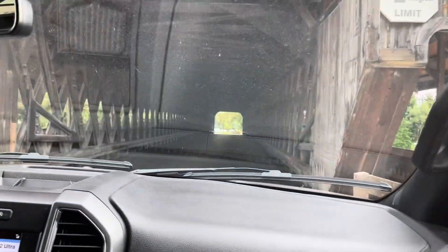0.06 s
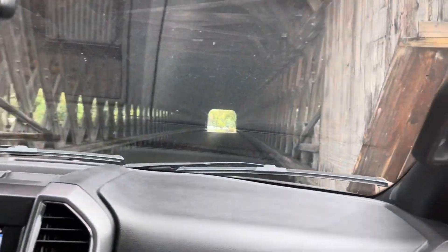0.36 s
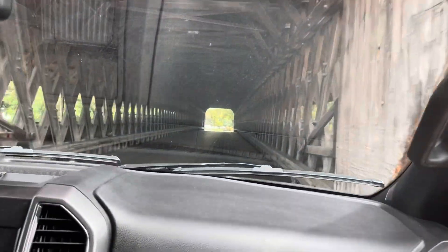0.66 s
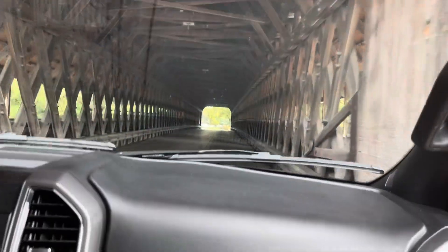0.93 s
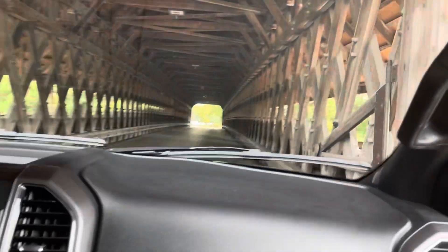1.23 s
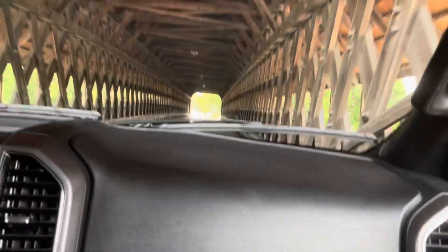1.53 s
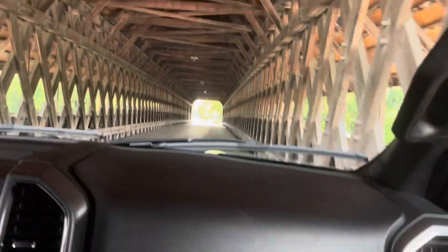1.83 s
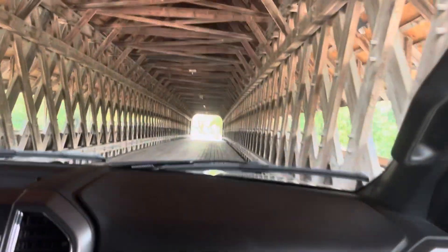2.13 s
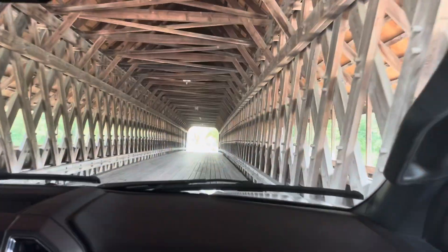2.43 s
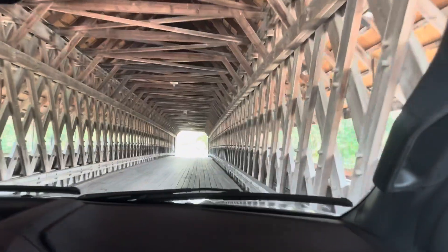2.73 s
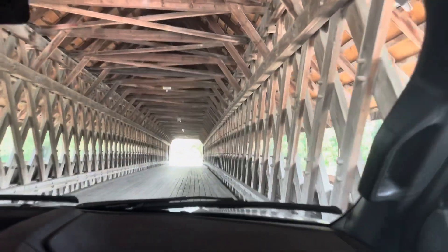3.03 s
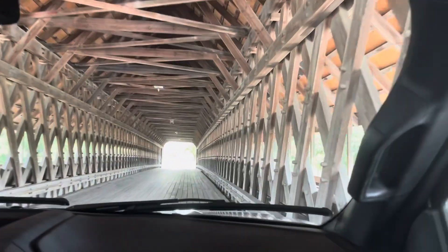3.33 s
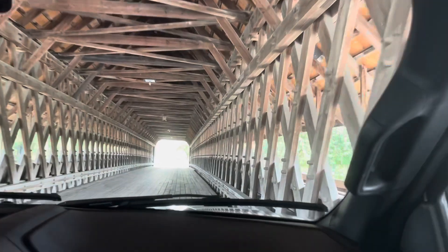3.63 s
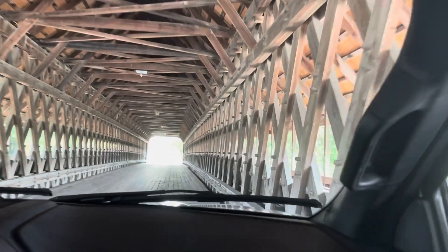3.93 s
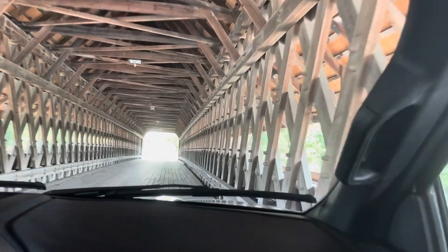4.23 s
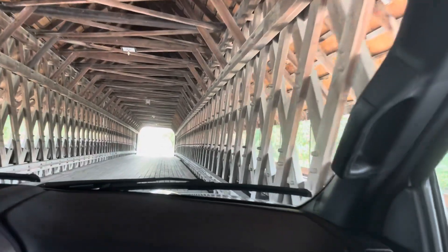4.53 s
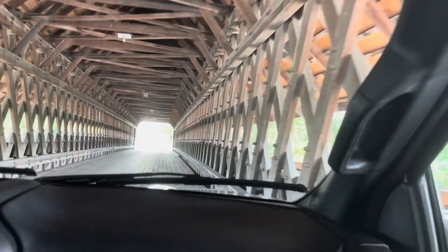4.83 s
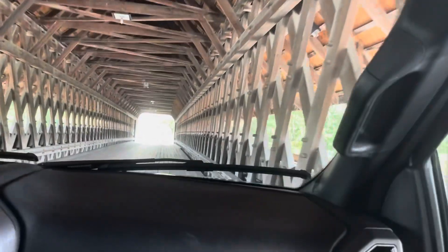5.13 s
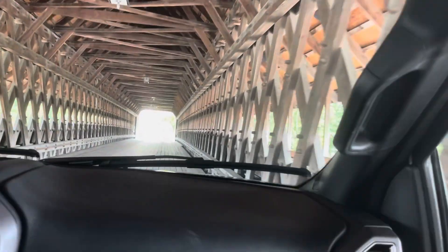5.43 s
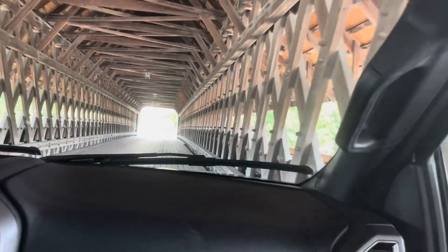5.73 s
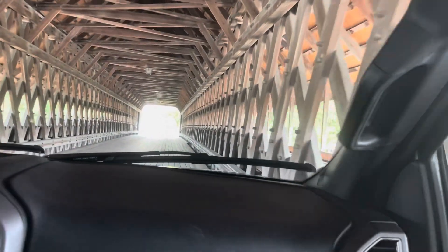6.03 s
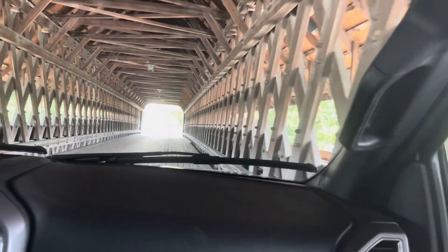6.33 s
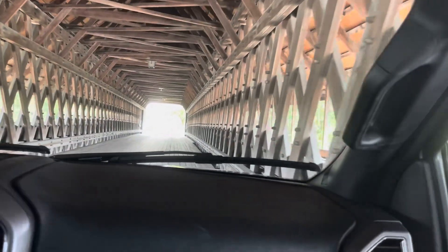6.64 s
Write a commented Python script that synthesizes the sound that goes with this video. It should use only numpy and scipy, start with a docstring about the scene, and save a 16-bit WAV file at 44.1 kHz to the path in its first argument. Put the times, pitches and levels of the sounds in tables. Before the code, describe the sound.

Inside a pickup's cab, slowly rolling tyres rumble under a low engine drone and a soft hiss from the air vents. The front wheels hit a wooden bridge deck with a booming thump, rattling trim and a hard knock. About a second later the rear wheels land with another deep thump and rattle. The rumble carries on, with faint cloth rustles and a few sharp plastic ticks close to the microphone.

```python
"""Pickup entering a covered wooden bridge.

Heard in the cab, the slowly rolling tyres rumble under a low engine drone and the hiss of air vents.
Front, then rear wheels strike the deck: each impulse excites the modes of the body, which booms,
and loose things rattle. Cloth rustles, and nearby plastic ticks set the microphone port or case ringing."""
import sys
import numpy as np
from scipy import signal
from scipy.fft import rfft, irfft
from scipy.io import wavfile
from scipy.ndimage import uniform_filter1d

SR = 44100
rng = np.random.default_rng(int(sys.argv[2]) if len(sys.argv) > 2 else 0)


def transcribe(u):
    """Save the signal u as a 16-bit wav file named by the first command-line argument.

    u: samples, shape (n,) or (channels, n), limited to [-1, 1]; the rate is SR.
    q: integer samples, one column per channel.
    """
    v = np.clip(np.atleast_2d(u).T, -1, 1)
    q = np.round(v * 32767).astype(np.int16)
    wavfile.write(sys.argv[1], SR, q)


N = 294147
T = np.arange(N) / SR
HZ = np.fft.rfftfreq(N, 1 / SR)
ROOF_HZ, ROOF_WIDTH_HZ = 144.7, 16  # resonance of the roof panel
# Shaking as the front, then the rear axle lands; levels in all tables are relative
# (t/s, rise/s, hold/s, release t60/s, rattle/dB, rustle/dB, roof drum/dB)
AXLES = [(1.222, 0.006, 0.27, 0.45, -43.5, -44.5, -24), (2.294, 0.12, .16, 1.0, -42, -46.5, -19)]
# Plastic ticks near the microphone (t/s, level/dB, t60/s, hollow part re bright part/dB)
TICKS = [(1.226, -31, 0.11, -3), (1.269, -34, 0.11, -0.5), (2.095, -38.5, 0.08, -27),
         (2.687, -34.5, 0.065, -28), (3.172, -51, 0.066, -12), (3.268, -44.5, 0.062, -24),
         (3.331, -53.5, .05, -12), (3.485, -53, .04, -14), (3.612, -44, 0.056, -6),
         (3.804, -47.5, 0.023, -5), (4.290, -29, 0.06, -7.5), (4.873, -30, 0.044, -10.5),
         (5.2315, -47, .06, -13), (6.429, -44, .03, -20), (6.434, -43, .06, -20)]


def amp(db):
    """Amplitude ratio of a level in decibels."""
    return 10 ** (np.asarray(db) / 20)


def unit_rms(x):
    """Normalisation to an rms value of 1."""
    return x / np.sqrt(np.mean(x ** 2) + 1e-20)


def spectrum_at(points, hz):
    """Interpolation of a spectrum on a logarithmic frequency axis."""
    f, value = np.transpose(points)
    return np.interp(np.log(hz + 1), np.log(f + 1), value)


def curve(rows, column=1):
    """Linear interpolation of one column of a time table at every sample."""
    rows = np.array(rows)
    return np.interp(T, rows[:, 0], rows[:, column])


def colour(x, points):
    """Minimum-phase filtering at unit energy; beyond its table the spectrum falls 48 dB an octave."""
    hz = abs(np.fft.fftfreq(8192, 1 / SR))
    octaves_below = np.maximum(np.log2(points[0][0] / (hz + 1)), 0)
    octaves_above = np.maximum(np.log2((hz + 1) / points[-1][0]), 0)
    gain = amp(np.maximum(spectrum_at(points, hz) - 48 * (octaves_below + octaves_above), -100))
    taps = np.fft.ifft(np.exp(np.conj(signal.hilbert(np.log(gain))))).real[:4096]
    return signal.oaconvolve(x, taps[None] / np.linalg.norm(taps), axes=1)[:, :N]


def noise():
    """Two uncorrelated white noises: the common and the diffuse part of the sound field."""
    return rng.standard_normal((2, N))


def drift(cutoff_hz):
    """Random modulation: low-pass noise of rms 1."""
    return unit_rms(irfft(rfft(rng.standard_normal(N)) / (1 + (HZ / cutoff_hz) ** 4), N))


def grains(per_s, spread_db):
    """Shot noise: impulses of uneven size at random times."""
    size = amp(spread_db * np.minimum(rng.exponential(1, N), 4))
    return unit_rms(noise() * size * (rng.random(N) < per_s / SR))


def resonance(hz, centre, width):
    """Lorentzian resonance curve, 1 at its centre."""
    return 1 / (1 + (2 * (hz - centre) / width) ** 2)


def resonant_noise(peaks):
    """Random excitation of resonances (f/Hz, width/Hz, level/dB), scaled to rms 1."""
    gain = sum(amp(db) * resonance(HZ, hz, width) for hz, width, db in peaks)
    return unit_rms(irfft(rfft(noise()) * gain, N))


def ring(modes, wave=np.sin):
    """Free vibration as a sum of damped modes (f/Hz, level/dB, t60/s)."""
    t = T[:SR]
    return sum(amp(db - 60 * t / t60) * wave(2 * np.pi * hz * t) for hz, db, t60 in modes)


def add(mix, s, sound):
    """Superposition of a sound on the mix from time s."""
    part = mix[round(s * SR):][:len(sound)]
    part += sound[:len(part)]


def clicks(rows):
    """One ideal impulse for each row that begins (t/s, level/dB)."""
    out = np.zeros(N)
    for s, db, *_ in rows:
        out[round(s * SR)] += amp(db)
    return out


def bursts(rows):
    """Reverberation: each contact (t/s, level/dB, t60/s) starts a dying scatter of reflections."""
    envelope = np.zeros(N)
    for s, db, t60 in rows:
        add(envelope, s, amp(db - 60 * T[:SR] / t60))
    return envelope * noise()


def rubs(rows):
    """Envelope of sliding friction: each stroke swells and fades in one cosine arch."""
    return sum(amp(db) * np.cos(np.pi * (T - s) / length) * (abs(T - s) < length / 2)
               for s, length, db in rows)


def shaking(levels_db, sag_db_per_s=21.5):
    """Envelope of the damped vibration after each axle lands: a rise, a sagging hold, a release."""
    envelope = np.zeros(N)
    for (s, rise, hold, t60, *_), db in zip(AXLES, levels_db):
        t = np.maximum(T - s, 0)
        sag_db = sag_db_per_s * np.minimum(t, hold)
        release_db = 60 * np.maximum(t - hold, 0) / t60
        envelope += np.sqrt(np.minimum(t / rise, 1)) * amp(db - sag_db - release_db)
    return envelope


def vents(hiss_db=-56, ducts_db=-56, waver=0.003, flutter_db=3):
    """Flow noise: a steady hiss, narrow duct resonances and faint, wavering whistles."""
    # Spectrum of the air hiss (f/Hz, density/dB)
    hiss_spectrum = [(600, -5.5), (1000, -3.5), (1450, 1.5), (2000, -1.5), (2500, -2), (3000, -3.5),
                     (3400, -10), (4000, -14), (4700, -17), (6000, -29.5), (7500, -34.5), (8900, -20),
                     (10000, -31), (12000, -31), (12800, -48)]
    # Duct resonances (f/Hz, width/Hz, level/dB)
    duct_modes = [(1230, 51, -0.5), (1320, 60, 1.5), (1594, 70, 1), (1710, 90, 1), (1813, 75, 2.5),
                  (2105, 60, -8), (2240, 120, -9), (2713, 65, -1), (2970, 70, -3), (3420, 68, -12),
                  (3960, 170, -13)]
    # Whistles of the grilles (f/Hz, level/dB)
    whistles = [(1815, -69), (2735, -73.5)]
    # Gain of resonances and whistles together (t/s, level/dB)
    duct_level = [(0, 0.5), (3.3, 0), (4.7, 2), (6.6, 1)]
    ducts = amp(ducts_db) * resonant_noise(duct_modes)
    for hz, db in whistles:
        phase = 2 * np.pi * np.cumsum(hz * (1 + waver * drift(25))) / SR
        ducts[0] += amp(db + flutter_db * drift(9)) * np.sin(phase)
    return amp(hiss_db) * colour(noise(), hiss_spectrum) + ducts * amp(curve(duct_level))


def cloth(rest_db=-73):
    """Friction noise: fine grains of sound from cloth that slides or is shaken by the axles."""
    # Strokes of cloth on the seat (middle t/s, length/s, level/dB)
    strokes = [(.19, 0.47, -59), (.97, 0.49, -62), (1.68, 0.49, -57), (2.85, 0.72, -60.5),
               (3.65, 0.23, -56.5), (4.945, .24, -53.5), (5.94, 0.27, -63.5), (6.3, 0.79, -70)]
    # Spectrum of the rustle (f/Hz, density/dB)
    rustle_spectrum = [(1500, -7.5), (3000, -1), (4500, -3.5), (6300, -3.5), (7300, -4), (8300, 0),
                       (8800, 1.5), (9600, 5.5), (10200, -4), (10800, -6), (11600, -12), (12500, -37)]
    *_, rustle_levels, _ = np.transpose(AXLES)
    sliding = np.hypot(rubs(strokes), shaking(rustle_levels))
    rustle = colour(grains(per_s=8700, spread_db=-0.5), rustle_spectrum)
    return rustle * np.hypot(sliding, amp(rest_db))


def squeak(hz=2575, waver=0.028):
    """Stick-slip oscillation: two pieces of trim rub and sing briefly."""
    # Faint squeaks (middle t/s, length/s, level/dB)
    squeaks = [(.298, .025, -54), (.318, .024, -49), (.351, .015, -46), (.366, .012, -54),
               (.388, .015, -52), (.401, .014, -50)]
    phase = 2 * np.pi * np.cumsum(hz * (1 + waver * drift(151))) / SR
    return rubs(squeaks) * np.sin(phase)


def engine(waver_db=0.5, rough_db=1, uneven_db=-13, roof_db=-35):
    """Periodic firing gives a drone and its harmonics; unequal cylinder banks add a half order."""
    # Engine drone (t/s, firing f/Hz, fundamental/dB, octave/dB)
    firing = [(0, 50.91, -20, -31), (.9, 49.54, -20.5, -37.5), (2.0, 52.25, -26.5, -37),
              (2.75, 59.8, -27, -36), (3.2, 61.7, -22, -31.5), (3.6, 60.6, -29.5, -31.5),
              (4.0, 57.84, -22.5, -24.5), (4.45, 57.01, -15, -26), (5.2, 56.7, -18, -23.5),
              (5.65, 55.8, -17.5, -31.5), (6.1, 55.4, -19.5, -36.5), (6.67, 54.84, -24.5, -34.5)]
    hz, drone_db, octave_db = (curve(firing, column) for column in (1, 2, 3))
    phase = 2 * np.pi * np.cumsum(hz * (1 + 0.004 * drift(4.9))) / SR
    drone = amp(drone_db + waver_db * drift(18)) * np.sin(phase)
    octave = amp(octave_db + rough_db * drift(21)) * np.sin(2 * phase + 0.11 * drift(22))
    banks = amp(uneven_db + drone_db + rough_db * drift(15)) * np.sin(1.5 * phase)
    # The roof hums when the third harmonic nears its resonance.
    roof = amp(roof_db) * resonance(3 * hz, ROOF_HZ, ROOF_WIDTH_HZ) * np.sin(3 * phase)
    return np.sqrt(2) * (drone + octave + banks + roof)


def tyres(roar_db=-30, flutter_db=0.76, evening=0.65, shaken_rumble_db=-12, shaken_roar_db=-4):
    """Rolling noise: a low rumble and a fluttering tread roar, both swelling as an axle lands."""
    # Spectrum of the rumble in the cab (f/Hz, density/dB)
    rumble_spectrum = [(25, -28.5), (30, -6), (34, -3), (40, 2), (47, -2.5), (70, -3), (90, -3),
                       (115, -11.5), (141, -17), (165, -20.5), (200, -24.5)]
    # Spectrum of the tread on the planks (f/Hz, density/dB)
    roar_spectrum = [(100, -28), (170, -3.5), (193, -4.5), (232, 0), (271, -8.5), (299, -8.5), (362, -7.5),
                     (459, -6.5), (673, -22.5), (815, -22), (884, -27), (1020, -27.5), (1500, -44),
                     (1950, -64.5), (3300, -120)]
    # Rumble over road and deck (t/s, level/dB)
    surface_level = [(0, -18.5), (1.8, -17.5), (2.22, -22), (2.45, -18.5), (3.4, -19), (4.4, -18.5),
                     (5.2, -17.5), (6.6, -19)]
    shake = shaking([0, 0])
    low = colour(noise(), rumble_spectrum)
    swing = np.sqrt(abs(uniform_filter1d(low[0] ** 2, size=7000)))
    rumble = unit_rms(low / swing ** evening) * amp(curve(surface_level))  # suspension evens the swings
    roar = colour(noise(), roar_spectrum) * amp(roar_db + flutter_db * drift(12))
    return rumble * (1 + amp(shaken_rumble_db) * shake) + roar * (1 + amp(shaken_roar_db) * shake)


def plastic_ticks(scatter_db=-7, click_db=9):
    """Contact transients near the microphone: a dry click, then a scatter of reflections."""
    # Spectrum of the bright part (f/Hz, density/dB)
    bright_spectrum = [(4000, -27.5), (6300, -25.5), (7500, -10.5), (8400, -9), (8750, -1), (9200, -0.5),
                       (9700, 3), (10300, -3.5), (11300, -9.5), (12600, -21), (13300, -25)]
    # Spectrum of the lower, hollow part (f/Hz, density/dB)
    hollow_spectrum = [(1800, -12.5), (2600, -2), (3900, 1), (4600, -2.5), (5300, -6), (6100, -14.5)]
    bright = colour(bursts([(s, db, t60) for s, db, t60, _ in TICKS]), bright_spectrum)
    hollow = colour(bursts([(s, db + low_db, t60) for s, db, t60, low_db in TICKS]), hollow_spectrum)
    out = amp(scatter_db) * (bright + hollow)
    out[0] += amp(click_db) * colour(clicks(TICKS)[None], bright_spectrum)[0]
    return out


def port_ring(level_db=-12):
    """Resonance: high ringing of the microphone port or phone case, set off by each tick."""
    # Modes of the port or case (f/Hz, level/dB, t60/s)
    modes = [(7550, -13, .05), (8750, -2, .06), (9350, -5, .055), (9750, -7.5, .04), (10900, -11.5, .03)]
    return amp(level_db) * signal.oaconvolve(clicks(TICKS), ring(modes))[:N]


def metal_pings(hz=2335, t60=0.064):
    """A small metal piece rings in a single damped mode."""
    # Pings (t/s, level/dB)
    pings = [(2.385, -37), (2.476, -38), (2.793, -45.5)]
    out = np.zeros(N)
    for s, db in pings:
        add(out, s, ring([(hz, db, t60)]))
    return out


def panel(level_db=-3, rise_s=0.004, detune=0.015):
    """Repeated impact: a loose panel bounces and rings, a little higher or lower at each tap."""
    # Taps after the front wheels land (t/s, level/dB)
    taps = [(1.226, -38), (1.264, -31), (1.279, -30), (1.297, -34), (1.309, -27), (1.333, -32),
            (1.342, -31), (1.369, -24), (1.39, -39), (1.403, -31), (1.434, -32), (1.496, -29.5),
            (1.51, -37)]
    # Modes of the panel (f/Hz, level/dB, t60/s)
    modes = [(1246, 0.5, 0.058), (1320, -4, 0.063), (1590, -13, .04), (2160, -14, .04)]
    attack = np.minimum(T[:SR] / rise_s, 1)
    out = np.zeros(N)
    for (s, db), stretch in zip(taps, 1 + detune * rng.standard_normal(len(taps))):
        tone = ring([(hz * stretch, mode_db, t60) for hz, mode_db, t60 in modes])
        add(out, s, amp(db + level_db) * attack * tone)
    return out


def knock(snap_db=-8, knock_db=-1, rise_s=0.0016):
    """A hard impact in the cab: a broadband snap, then the hollow sound of heavily damped modes."""
    # Spectrum of the snap of hard plastic (f/Hz, density/dB)
    snap_spectrum = [(800, -4), (1700, 4), (2300, 2.5), (3200, -5), (4300, -1), (6000, 2), (7000, -10),
                     (7900, -15), (9200, 0), (10200, 1), (11000, 4), (12200, -7), (13200, -13)]
    # Modes of the knock (f/Hz, level/dB, t60/s)
    modes = [(572, -8.5, 0.03), (680, -17, 0.0063), (492, -12.5, .022), (395, -11.5, .022), (300, -19, .03),
             (210, -23.5, .07)]
    out = colour(clicks([(1.4427, snap_db)])[None], snap_spectrum)[0]
    attack = np.minimum(T[:SR] / rise_s, 1)
    add(out, 1.4433, -amp(knock_db) * attack * ring(modes))
    return out


def rattle(clack_db=-9, jolt_db=2):
    """Forced vibration: the shaking body makes loose things chatter, the roof drum and trim clack."""
    # Spectrum of the chatter (f/Hz, density/dB)
    chatter_spectrum = [(450, -19.5), (700, -1), (1000, 1), (1300, -1.5), (1600, -4.5), (2200, -12),
                        (3000, -17), (4500, -26), (8000, -26), (12000, -45)]
    # Dull clacks of trim (t/s, level/dB, t60/s)
    clacks = [(1.229, -28, .06), (1.237, -31, .06), (1.269, -24.5, .13), (1.307, -34, .05),
              (1.364, -26.5, .06), (1.372, -26, .045), (1.399, -36, .04), (1.425, -31.5, 0.058),
              (1.466, -33, .04), (1.492, -31.5, .045), (1.511, -34.5, .046), (2.317, -34, .05),
              (2.323, -31, .06), (2.377, -28.5, 0.045), (2.396, -33, .06), (2.414, -31, 0.088),
              (2.451, -34.5, .04), (2.472, -32, .034), (2.492, -33, .054), (2.586, -36.5, .05),
              (2.876, -27.5, .035), (2.882, -32, .04), (3.178, -35, .089), (4.705, -33.5, 0.063),
              (5.232, -35, .086)]
    # Spectrum of the clacks (f/Hz, density/dB)
    trim_spectrum = [(500, -6), (800, 6.5), (1030, 8), (1250, 1), (1600, 0), (2200, 0), (2700, -7),
                     (3500, -8), (5000, -21), (9000, -21.5), (12000, -34.5)]
    *_, rattle_levels, _, drum_levels = np.transpose(AXLES)
    jolts = shaking(rattle_levels) * amp(jolt_db * drift(50))
    chatter = jolts * colour(grains(per_s=4000, spread_db=2), chatter_spectrum)
    drum = shaking(drum_levels) * resonant_noise([(ROOF_HZ, ROOF_WIDTH_HZ, 0)])
    return chatter + drum + amp(clack_db) * colour(bursts(clacks), trim_spectrum)


def wheel_thumps(leak_hz=8):
    """Impact excitation: the tyre's compliance rounds each blow to a pulse that sets the body booming."""
    # Wheels striking the deck's edge and uneven planks (t/s, impulse level/dB, contact time/s)
    blows = [(1.229, -7.5, .008), (1.245, -8.5, 0.011), (1.264, -1.5, 0.011), (1.296, -4, 0.012),
             (1.316, -6.5, .008), (1.351, -4, 0.012), (1.374, -4, 0.014), (1.403, -8, .01),
             (1.424, -4, 0.016), (2.3, -6.5, 0.0075), (2.315, -8.5, .011), (2.34, 6.5, 0.022),
             (2.362, -5, .018), (2.383, -2, .012), (2.421, -8.5, 0.006), (2.457, -6.5, 0.0045),
             (2.492, -5.5, 0.012), (2.529, -4.5, 0.013), (2.586, -10.5, 0.013), (2.652, -12, .01),
             (2.949, -5.5, 0.02)]
    # Modes of the body and the cab air (f/Hz, level/dB, t60/s)
    body_modes = [(40.3, -14, 0.28), (47.6, -6.5, 0.27), (54.7, -3, 0.18), (68.2, -2, 0.24),
                  (140.7, -23, 0.77), (231, -28.5, 0.16)]
    force = np.zeros(N)
    for s, db, contact in blows:
        push = np.sin(np.pi * np.minimum(T[:SR] / contact, 1)) ** 2
        add(force, s - contact / 2, amp(db) * push / push.sum())
    boom = signal.oaconvolve(force, ring(body_modes, np.cos))[:N]
    leak = signal.butter(1, leak_hz, "high", fs=SR)  # steady pressure leaks out of the cab
    return signal.lfilter(*leak, boom)


def microphone_ports(pair):
    """Partial coherence: two ports share the common signal and take the diffuse one in opposite sign."""
    # Likeness of the ports (f/Hz, coherence before limiting to 0..1)
    likeness = [(100, 1.5), (230, 0.82), (400, 1), (600, 0.67), (830, 0.11), (1700, 0.23), (2300, 0.95),
                (3000, 0.8), (4500, 2.5), (8000, 0.5), (10300, 1.4), (11000, 0.5)]
    # Lead of left over right (f/Hz, phase/rad)
    phase_lead = [(120, 0.12), (220, 0.14), (400, 0.73), (830, -0.8), (1700, -0.5), (2300, 0.86),
                  (2900, 0.85), (6700, 1.2), (7900, 1), (8700, -0.7), (9400, -2), (10200, -3),
                  (10900, -4.5), (12000, -4.5)]
    # Left minus right (f/Hz, level/dB)
    level_difference = [(60, 0.75), (120, 2.5), (220, -1.2), (400, 3), (600, 1), (850, 0), (2000, 0),
                        (3000, 3.4), (6500, 3), (8500, 0)]
    common, diffuse = rfft(pair)
    coherence = np.clip(spectrum_at(likeness, HZ), 0, 1)
    diffuse *= np.sqrt((1 - coherence) / (1 + coherence))
    left_gain = np.exp(.5j * spectrum_at(phase_lead, HZ)) * amp(spectrum_at(level_difference, HZ) / 2)
    return irfft(np.array([(common + diffuse) * left_gain, (common - diffuse) / left_gain]), N)


def scene():
    """Superposition of all sources at the passenger seat."""
    cab = tyres() + vents() + rattle() + cloth() + plastic_ticks()
    cab[0] += engine() + wheel_thumps() + knock() + metal_pings() + panel() + port_ring() + squeak()
    soft_ends = signal.windows.tukey(N, .002)
    return microphone_ports(cab * soft_ends)


def record(dry):
    """Soft saturation rounds the largest peaks; a low-pass filter then limits the bandwidth."""
    knee, cutoff_hz = .88, 13200
    excess = np.maximum(abs(dry) - knee, 0)
    rounded = np.clip(dry, -knee, knee) + np.sign(dry) * (1 - knee) * np.tanh(excess / (1 - knee))
    low_pass = signal.firwin(511, cutoff_hz, window=("kaiser", 9), fs=SR)
    return signal.oaconvolve(rounded, low_pass[None], "same")


dry = scene()
out = record(dry)
transcribe(out)
```